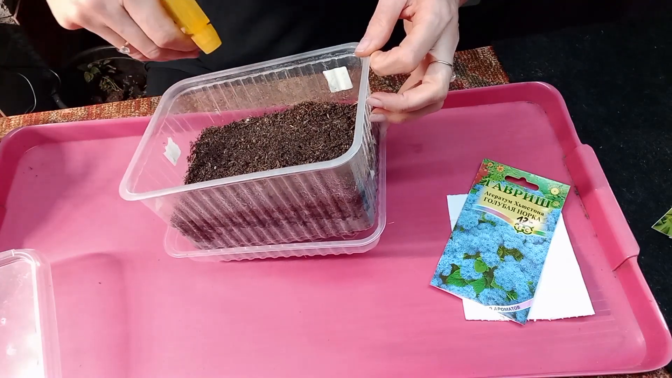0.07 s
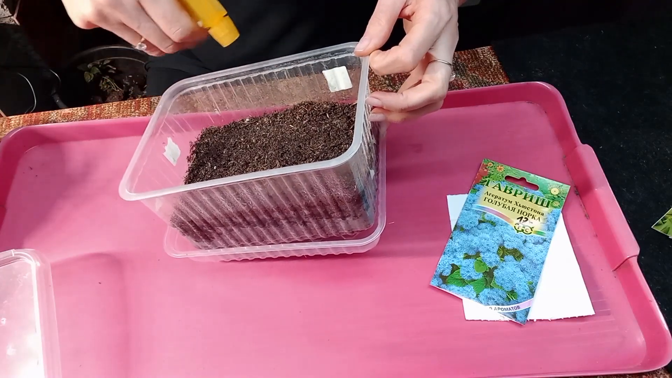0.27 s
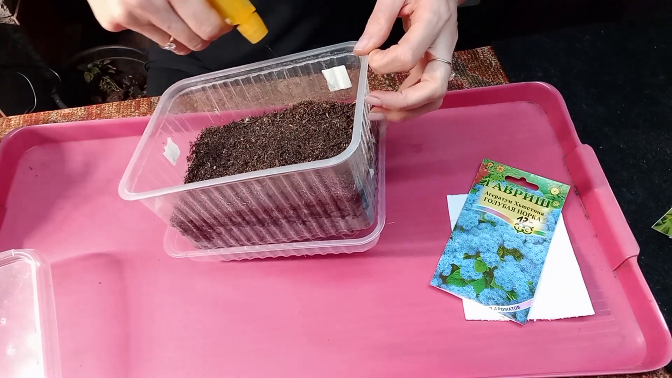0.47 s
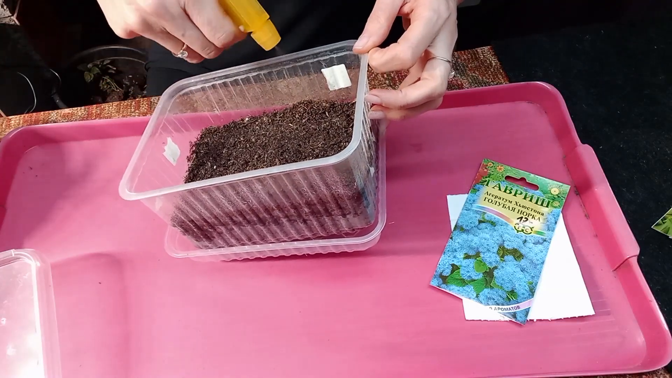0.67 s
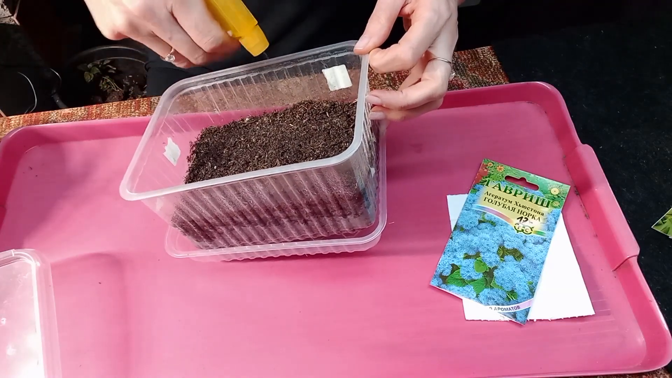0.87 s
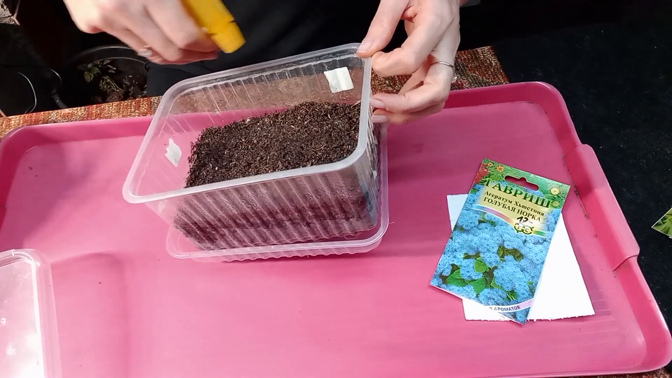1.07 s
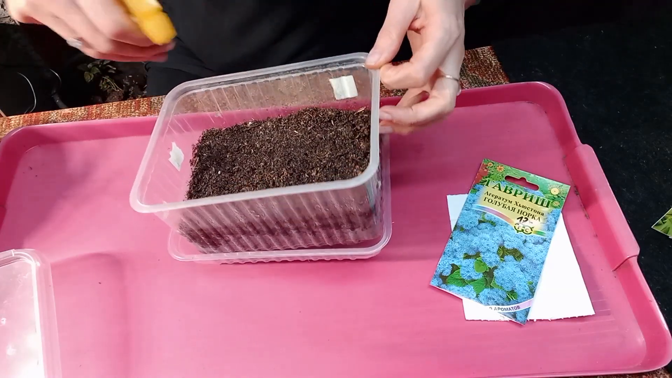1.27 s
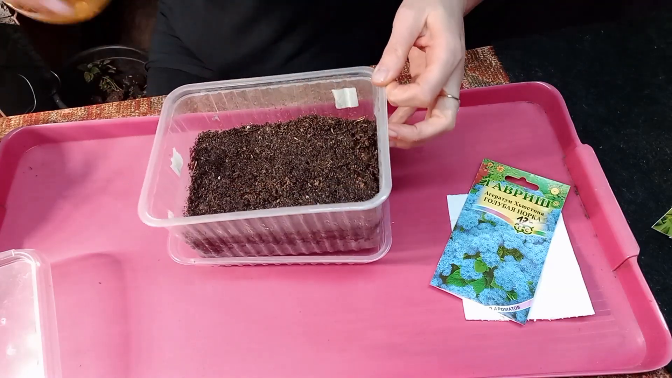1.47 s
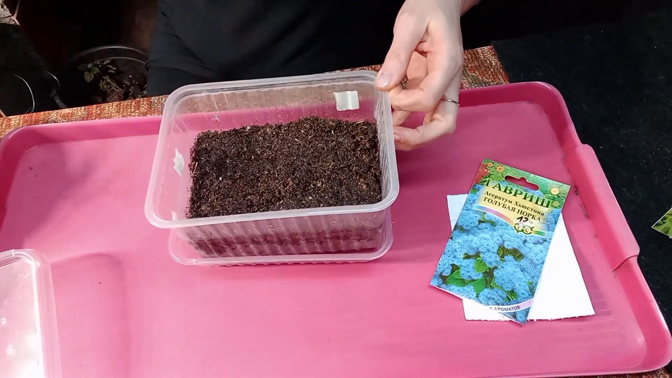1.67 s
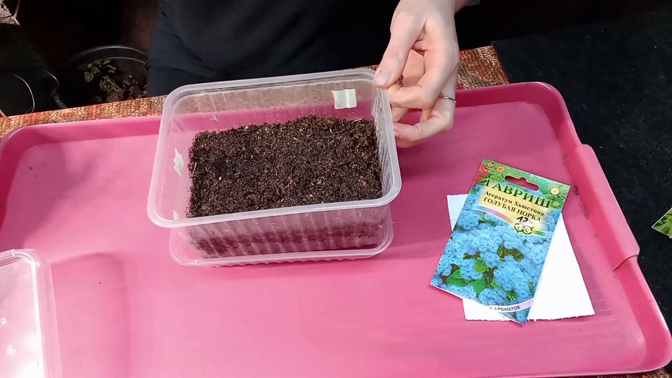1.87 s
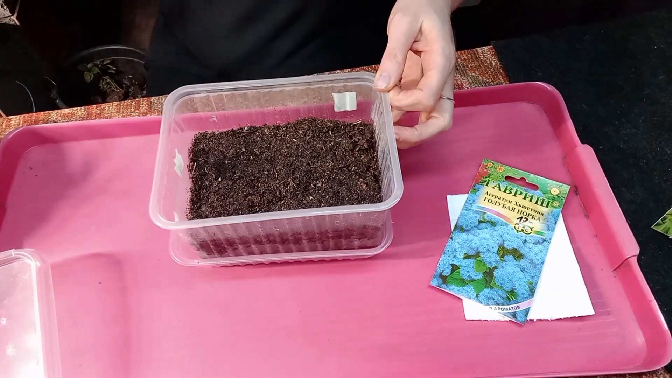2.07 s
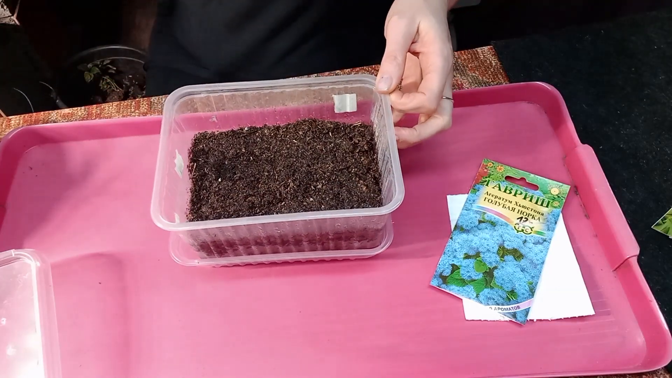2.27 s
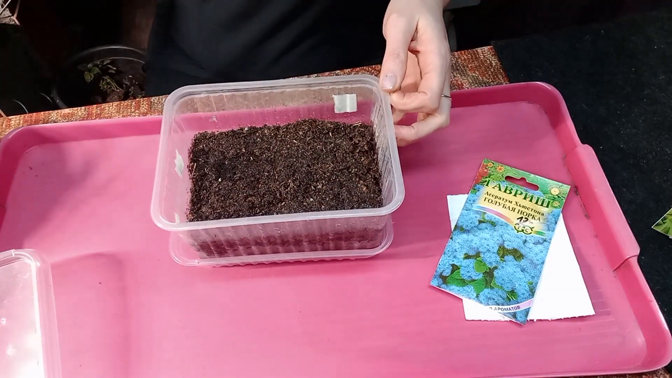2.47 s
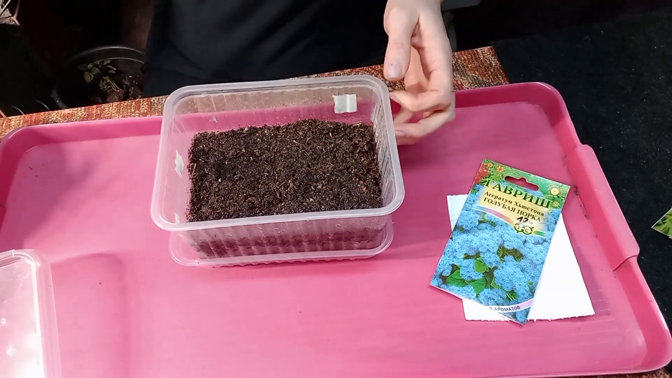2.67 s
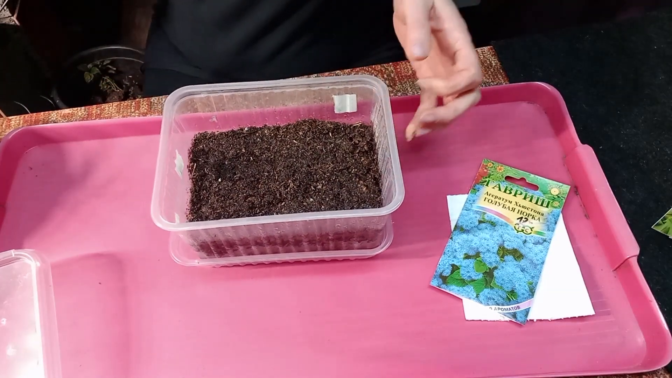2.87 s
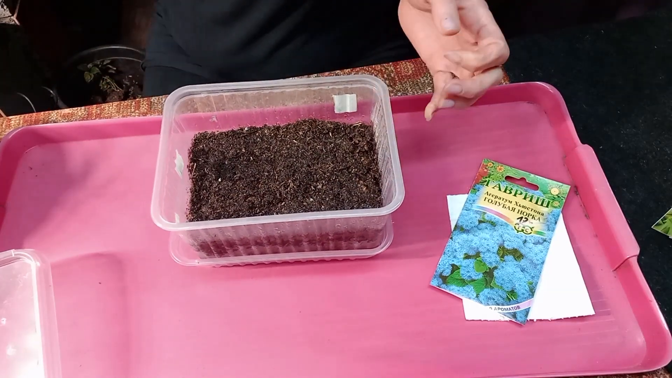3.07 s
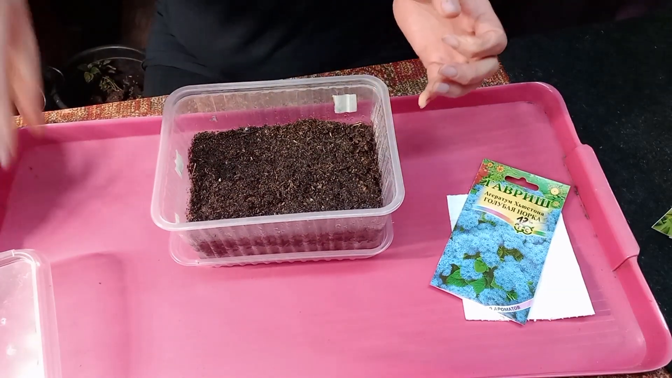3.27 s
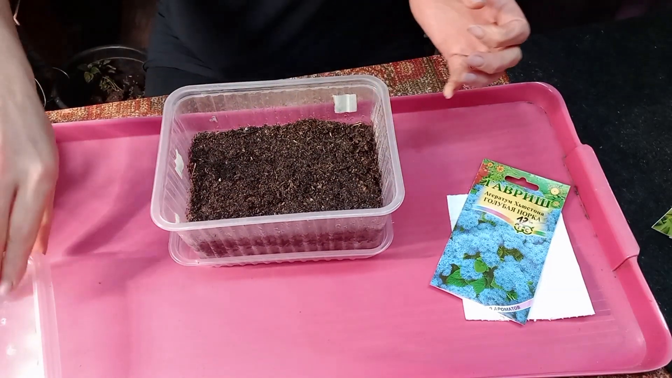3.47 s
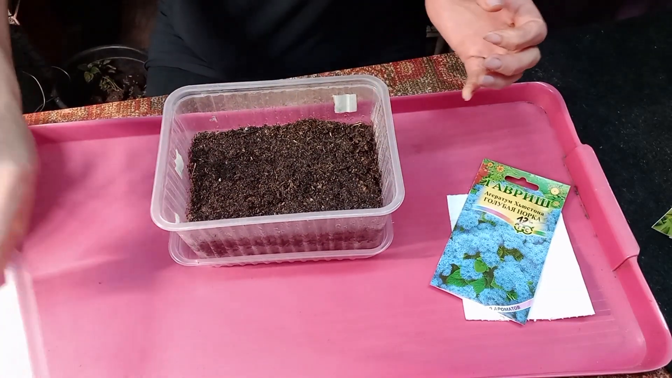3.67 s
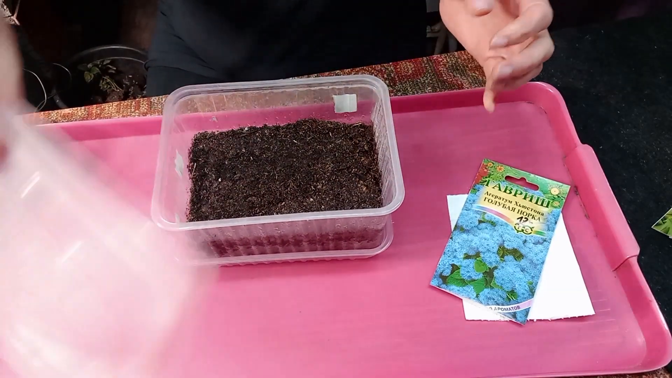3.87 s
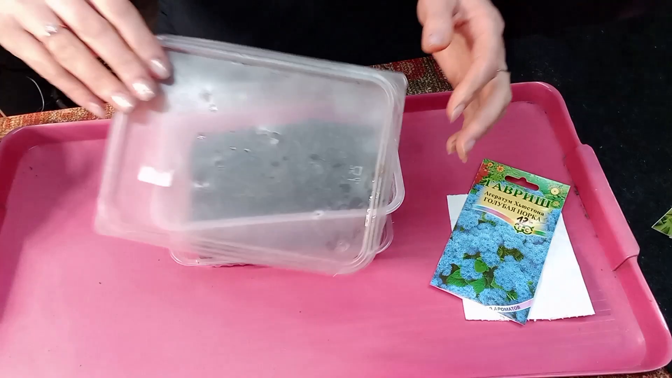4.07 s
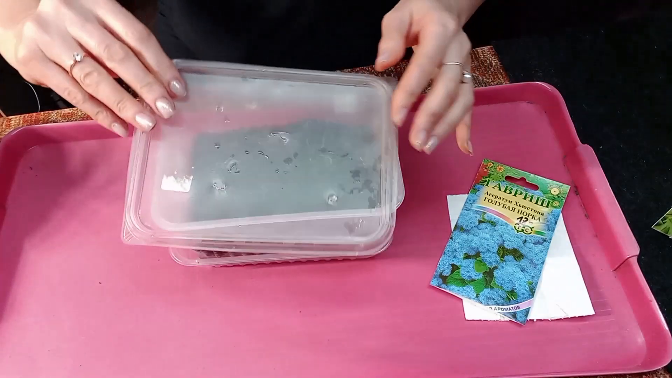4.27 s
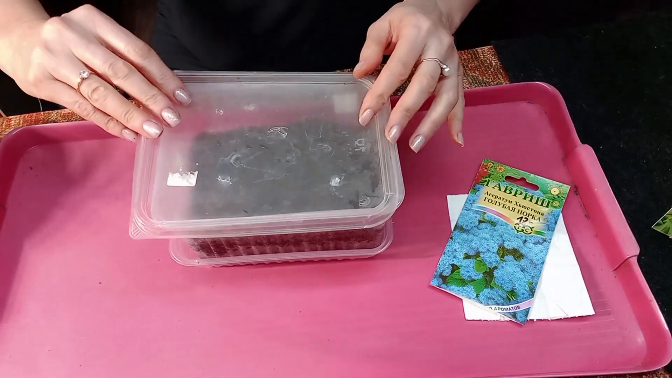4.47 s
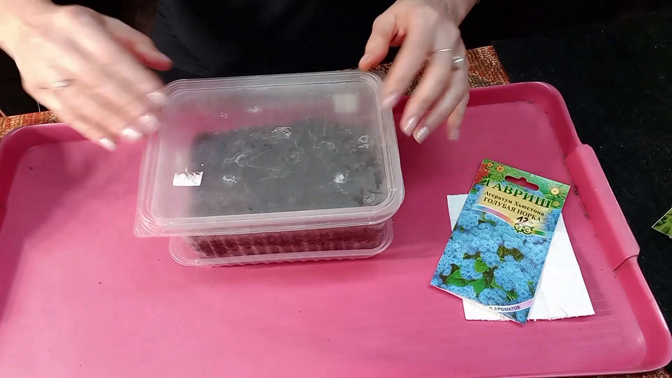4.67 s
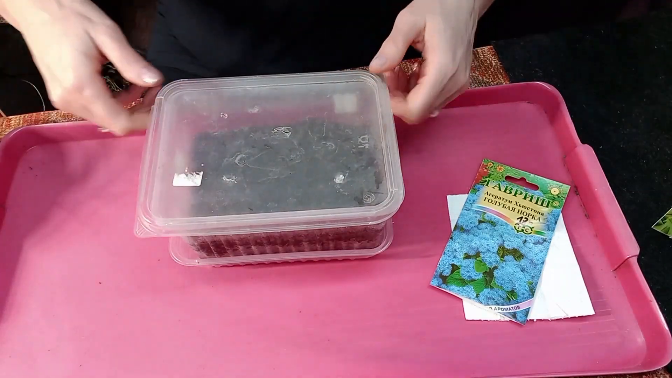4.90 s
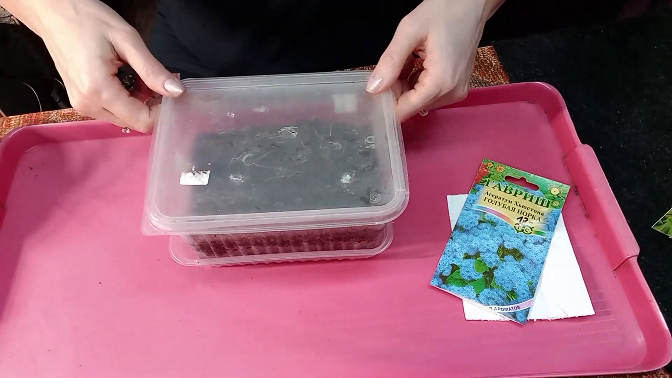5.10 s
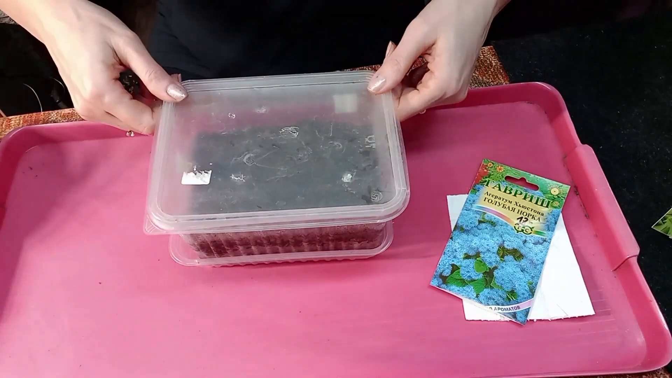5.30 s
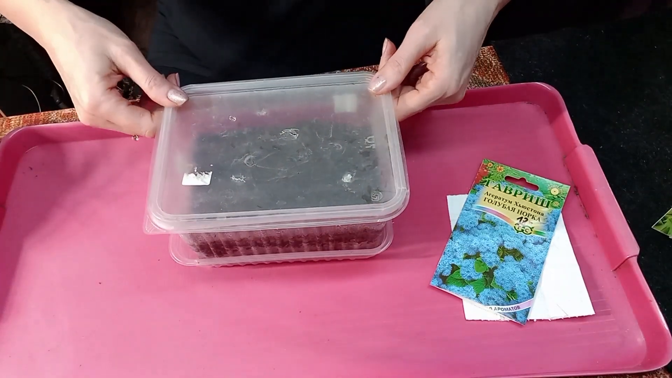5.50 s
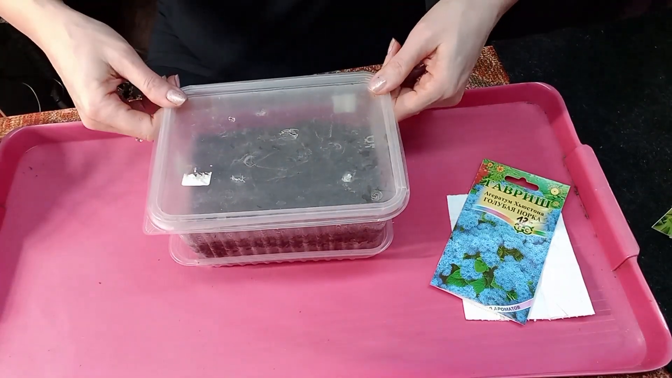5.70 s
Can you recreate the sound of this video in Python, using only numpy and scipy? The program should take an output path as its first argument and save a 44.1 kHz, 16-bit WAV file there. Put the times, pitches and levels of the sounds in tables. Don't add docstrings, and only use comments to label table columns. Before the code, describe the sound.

Recorded very close in a small quiet room with faint steady hiss and a short dull tail. From 0 to 0.5 s a trigger sprayer makes strong airy squirts, with thin whistling edges, sharp lever and valve ticks and hollow bottle bumps. Weaker puffs and dribbles follow, then around 0.92-1.03 s a rapid sputter with bright clicks, fading to drips by 1.2 s. At 1.4-1.5 s the thin plastic tub clacks down, with hands rubbing softly until about 2 s. A tiny glassy ring at 2.17 s is cut off by a soft low thump at 2.3 s. Near quiet lasts until 3.4 s, when plastic scrapes and a loud sharp pop sounds at 3.6 s. The lid touches down with dull knocks around 3.95 s, rattles, rasps and crackles until 4.45 s, is handled lightly from 4.8 s, snaps firmly at 5.16 s, and ends with small rubs and a soft knock at 5.63 s.

```python
import sys
import numpy as np
from scipy import signal
from scipy.fft import rfft, irfft
from scipy.io import wavfile
from scipy.ndimage import uniform_filter1d

SR = 44100
rng = np.random.default_rng(int(sys.argv[2]) if len(sys.argv) > 2 else 0)


def magnitude_from_level(level_db):
    exponent = np.asarray(level_db, float) / 20
    return 10 ** exponent


def generate_wav(sig):
    pcm = np.round(np.clip(np.atleast_2d(sig).T, -1, 1) * 32767).astype(np.int16)
    wavfile.write(sys.argv[1], SR, pcm)


N = 253134
T = np.arange(N) / SR

# (start [s], rise [s], fall [s], jet level [dB])
SQUEEZES = [(0, 0.00058, .013, -28.5), (.006, .017, .045, -26), (0.205, .054, 0.033, -24),
            (.448, 0.044, .031, -28.5), (.588, 0.019, .033, -47), (0.726, 0.0025, 0.023, -33.5),
            (.84, .016, 0.056, -54.5), (.924, 0.0018, 0.006, -41), (.934, 0.0054, .012, -35.5),
            (.951, 0.009, 0.013, -28.5), (.969, 0.003, 0.012, -31), (0.985, 0.005, 0.013, -34),
            (0.992, 0.005, .016, -27), (1.002, .014, 0.028, -26)]
# (start [s], fall [s], jet level [dB])
DRIBBLES = [
    (0.074, 0.018, -50.5),
    (.104, 0.058, -59.5),
    (.331, 0.058, -60),
    (.375, 0.023, -62),
    (0.565, 0.022, -57),
    (.683, 0.094, -58),
    (.803, 0.049, -61.5),
    (1.039, 0.02, -52),
    (1.086, 0.13, -61),
]
# (frequency [Hz], density [dB per Hz])
JET_SPECTRUM = [(180, -37), (300, -22.5), (510, -8.5), (1270, -17), (1850, -1), (2540, -9.5), (3370, -3),
                (6210, -4.5), (9870, -1), (11100, -6), (15700, -4.5)]
# (frequency [Hz], width [Hz], level [dB])
NOZZLE_RESONANCES = [(1710, 140, -2.5), (3810, 420, -2.5), (5100, 2400, -3), (8800, 3200, -3),
                     (10600, 700, -28)]
# (start [s], length
# [s], from [Hz], to [Hz], level [dB])
WHISTLES = [(.005, .05, 9000, 8500, -38), (.022, .014, 5100, 4900, -36), (.04, .022, 2100, 1900, -42),
            (.212, .075, 1750, 1800, -46), (.238, .042, 4150, 3150, -34.5), (.236, .03, 9900, 10300, -36),
            (.24, .035, 8800, 8600, -38), (.238, .03, 5900, 5500, -39), (.212, .03, 6700, 6900, -43),
            (.34, .008, 5900, 5300, -42), (.339, .022, 9600, 9600, -58), (.468, .03, 8700, 8600, -40),
            (.48, .035, 1850, 1750, -47), (.48, .025, 5300, 5000, -43), (.998, .025, 4900, 4700, -36),
            (.998, .035, 9000, 8500, -37), (1.093, .028, 4800, 4800, -56), (1.945, .022, 8300, 8200, -65)]
# (time [s], peak [dB])
LEVER_STOPS = [
    (.123, -26),
    (0.3771, -26),
    (0.8614, -26.5),
]
# (time [s], peak [dB], pitch [Hz])
VALVE_TICKS = [(.0014, -13.5, 8800), (0.077, -30.5, 9900), (.0864, -37, 10900), (.106, -32, 5770),
               (.146, -34.5, 6160), (0.2003, -27, 7600), (0.3304, -30, 9600), (0.3395, -26, 6500),
               (0.446, -28.5, 7910), (.4518, -29, 9200), (0.5681, -29, 9100), (.599, -28.5, 2840),
               (0.616, -28, 6800), (0.6214, -23.5, 4430), (.6863, -36.5, 5430), (.6997, -33, 4570),
               (.7267, -26, 3530), (0.809, -39, 6760), (.9255, -26, 10500), (.94, -35, 8290),
               (.984, -15, 8600), (0.9966, -11, 8600), (1.049, -36.5, 7690), (1.0932, -33.5, 4350),
               (1.1236, -38, 4230)]
# (time [s], peak [dB], pitch [Hz], T60 [s])
BOTTLE_BUMPS = [(0.07, -40.5, 463, 0.062), (0.099, -48.5, 815, 0.22), (0.132, -37, 754, 0.017),
                (0.192, -48.5, 500, 0.22), (0.287, -50.5, 553, 0.018), (0.325, -40.5, 780, 0.039),
                (0.352, -46.5, 826, 0.058), (0.376, -45.5, 925, 0.12), (0.386, -47, 720, 0.032),
                (0.44, -42.5, 740, 0.25), (0.561, -41, 887, 0.033), (0.585, -45.5, 870, 0.035),
                (0.6, -38, 600, 0.06), (0.68, -45.5, 694, 0.13), (0.699, -46.5, 846, 0.21),
                (0.727, -37, 600, 0.09), (0.8, -41.5, 814, 0.043), (0.826, -48, 800, 0.1),
                (0.855, -39, 780, 0.077), (0.874, -39.5, 1140, 0.034), (0.914, -44.5, 1020, 0.18),
                (1.067, -47.5, 500, 0.23), (1.124, -41.5, 860, 0.024)]
# (loudest at [s], swell [s], fade [s], hiss [dB], hollow share [dB])
SLIDES = [(1.25, 0.15, 0.58, -59.5, -8.5), (1.47, 0.091, 0.15, -53, 7.5), (1.6, 0.16, .04, -59, -2.5),
          (1.942, 0.26, 0.11, -56, -2), (3.55, 0.075, 0.016, -58, -8), (4.18, .09, .25, -53, -4),
          (4.376, .16, .08, -46.5, 2.5), (4.892, 0.081, 0.07, -48, .4), (4.96, .09, .015, -50, 0),
          (5.058, 0.02, 0.012, -47, 7.5), (5.27, 0.088, .1, -65, 0), (5.344, 0.027, 0.14, -54, -3.5),
          (5.628, 0.088, 0.064, -53, 1.5)]
# (loudest at [s], swell [s], fade [s], hiss [dB], hollow share [dB])
BRUSHES = [(1.84, 0.09, .1, -60, -12), (4.165, .03, .12, -54, -20), (4.31, .06, .06, -50, -12),
           (3.535, .02, .08, -55, -20), (2.549, .02, 0.031, -78.5, 8), (5.639, 0.063, 0.021, -51.5, -10),
           (4.77, 0.024, .08, -64, -15), (2.3, 0.16, 0.025, -68, -9), (2.432, 0.9, 0.22, -72, 3),
           (3.391, 0.013, .08, -56.5, 0), (3.435, 0.056, 0.06, -55, -0.5), (3.48, 0.073, 0.018, -50, -14),
           (3.571, .035, 0.0094, -48, -20), (5.124, .008, .024, -48.5, -4), (5.122, .04, .03, -64, 14)]
# (time [s], fade [s], hiss [dB], hollow [dB], rumble [dB])
SHUDDERS = [
    (2.171, 0.096, -77, -59, -62),
    (2.329, 0.12, -76, -56.5, -55),
    (3.51, 0.019, -61, -56, -58),
    (3.53, 0.14, -62, -55, -60),
    (3.621, 0.051, -41.5, -41, -35.5),
    (3.95, 0.067, -74, -68, -55),
    (4.04, .4, -86, -58, -48),
    (5.18, 0.038, -61, -38, -33.5),
]
# (time [s], peak [dB], loudest ring [Hz], crack [dB])
TRAY_KNOCKS = [
    (1.393, -43, 900, -7.5),
    (1.435, -33.5, 1780, -10),
    (1.451, -34.5, 1710, -3),
    (1.471, -26, 840, -22),
    (1.715, -46, 1480, -14),
    (1.945, -40.5, 3280, -5),
    (2.315, -40.5, 1290, -32),
]
# (time [s], peak [dB], loudest ring [Hz], crack [dB])
LID_KNOCKS = [(3.373, -46.5, 1040, -16), (3.434, -38, 860, -5), (3.498, -24, 1120, -3),
              (3.937, -33.5, 1060, -3.5), (4.014, -31.5, 910, -15), (4.036, -28, 550, -21),
              (4.158, -44, 2100, -14), (4.184, -37.5, 2080, -9), (4.226, -39, 2000, 0),
              (4.249, -29.5, 520, -5), (4.276, -32.5, 517, -21), (4.311, -45, 845, -3),
              (4.351, -22.5, 794, -45), (4.366, -28, 780, -22), (4.381, -27, 760, -30),
              (4.876, -41, 800, -10.5), (4.894, -31, 540, -32), (4.938, -42, 1760, -3.5),
              (4.96, -36, 470, -37), (5.053, -41, 512, 2.5), (5.118, -40, 830, 12), (5.314, -53, 1960, 4),
              (5.346, -37.5, 545, -0.5), (5.628, -36.5, 766, -37)]
# (time [s], peak [dB], loudest ring [Hz], crack [dB])
RIM_SNAPS = [
    (3.601, -19, 1220, -16),
    (3.604, -14, 1220, -3),
    (3.612, -19.5, 831, -13),
    (5.153, -31, 560, -24),
    (5.157, -16.5, 2050, -27),
    (5.161, -14, 541, -12.5),
    (5.175, -30, 500, -22),
]
# (time [s], peak [dB])
RIM_CLICKS = [
    (5.1185, -24),
    (5.1625, -26.5),
]
# (frequency [Hz], density [dB per Hz])
PLASTIC_SPECTRUM = [(150, -23), (400, -7), (1000, -5), (1550, -8), (2500, -5), (5000, -7.5), (9000, -13.5),
                    (16000, -29.5)]
# (frequency [Hz], width [Hz], level [dB])
TRAY_MODES = [(300, 90, 9), (540, 110, 8), (795, 230, 10.5), (1220, 64, 0.5), (2050, 810, 3.5),
              (2430, 490, 5), (3100, 160, 2.5), (3950, 1000, 5)]
# (time [s], peak [dB])
TABLE_THUDS = [(1.471, -69), (2.315, -47), (3.373, -53.5), (3.499, -54), (3.603, -43), (3.936, -36.5),
               (4.013, -34.5), (4.16, -58), (4.278, -43.5), (4.38, -34), (4.937, -40.5), (5.158, -46),
               (5.161, -30), (5.175, -43), (5.627, -53)]
# (frequency [Hz], level [dB], T60 [s])
TABLE_MODES = [(110, 3, 0.078), (140, 3.5, 0.13), (184, -3, 0.16), (272, -1, 0.11)]
# (time [s], level [dB], frequency [Hz], T60 [s])
LANDING = [
    (2.32, -41, 101, 0.22),
    (2.315, -52, 390, .06),
    (2.325, -51, 210, .12),
    (2.372, -53, 275, 0.09),
    (2.407, -50, 110, 0.097),
]
# (loudest at [s], swell [s], fade [s], level [dB], pitch [Hz])
RASPS = [(2.44, 0.015, 0.02, -65.5, 1800), (3.385, .012, 0.079, -58.5, 1150), (3.43, 0.03, 0.07, -55, 1250),
         (3.551, 0.098, 0.017, -64, 3100), (4.25, .12, 0.12, -55.5, 2280),
         (4.385, 0.058, 0.06, -50.5, 2270), (4.472, 0.038, .03, -58, 550), (3.1, .06, .05, -79, 1330),
         (4.25, .12, .1, -60, 12000), (4.38, .08, .03, -56, 11500), (4.9, .05, .1, -62, 12000),
         (5.165, .006, .03, -46, 12500), (5.63, .06, .03, -61, 12500)]
# (start [s], length [s], from [Hz], to [Hz], level [dB])
SCRAPES = [(1.75, .07, 3100, 3300, -69), (1.78, .1, 5600, 5400, -68), (1.79, .09, 10000, 9300, -68),
           (2.17, .07, 800, 740, -68), (2.18, .04, 420, 450, -68), (2.49, .06, 900, 780, -74),
           (3.408, .045, 950, 850, -56), (3.52, .05, 2700, 3050, -54), (3.55, .027, 7300, 7700, -53),
           (3.556, .022, 9400, 9500, -46), (4.055, .03, 420, 380, -53), (4.085, .05, 850, 700, -57),
           (4.125, .055, 420, 380, -53), (4.225, .035, 520, 540, -45), (4.31, .045, 6400, 6100, -58),
           (4.33, .025, 800, 760, -48), (4.385, .037, 780, 740, -46), (4.378, .025, 2500, 2200, -50),
           (4.8, .03, 900, 800, -64), (4.835, .055, 750, 800, -60), (4.91, .025, 5000, 5600, -57),
           (5.095, .04, 560, 580, -55)]
# (time [s], peak [dB], pitch [Hz], T60 [s])
CRACKLES = [(.116, -42, 5900, .012), (.7, -44, 9200, .008), (.712, -46, 8500, .008), (.82, -46, 6800, .01),
            (.889, -44, 9000, .008), (.624, -37, 690, .05), (.689, -44, 580, .03), (.74, -34, 1450, .02),
            (.742, -38, 620, .03), (.836, -42, 1100, .03), (.877, -38, 1370, .04),
            (1.3945, -38, 4300, .008), (1.419, -48, 2500, .008), (1.444, -38, 1800, .012),
            (1.457, -35, 2400, .012), (1.458, -41, 9000, .01), (1.4715, -33, 4700, .006),
            (1.534, -46, 900, .04), (1.602, -52, 3500, .01), (1.605, -52, 10000, .008),
            (1.67, -56, 4500, .006), (1.678, -52, 3200, .008), (1.855, -44, 5200, .008),
            (1.891, -52, 800, .03), (1.926, -48, 8000, .008), (2.378, -60, 1450, .03),
            (2.41, -60, 1400, .03), (2.436, -58, 1450, .03), (3.391, -52, 7000, .02),
            (3.46, -49, 1300, .02), (4.087, -46, 900, .03), (4.196, -44, 2100, .015),
            (4.215, -46, 5000, .01), (4.238, -43, 2200, .015), (4.254, -38, 3000, .012),
            (4.304, -45, 2100, .02), (4.313, -45, 4000, .014), (4.341, -42, 2000, .015),
            (4.16, -46, 2300, .02), (4.365, -40, 1700, .015), (4.29, -47, 3200, .01),
            (4.455, -47, 490, .04), (4.895, -42, 4300, .01), (4.94, -44, 2800, .01),
            (5.055, -40, 4300, .008), (5.119, -32, 4600, .007), (5.163, -19, 550, .09),
            (3.606, -22, 3500, .015), (5.331, -56, 1900, .02)]
# (frequency [Hz], level [dB], T60 [s])
GLASS_MODES = [(590, -62, 0.2), (1400, -67, 0.96), (1575, -59.5, 0.72), (2770, -74.5, 0.74),
               (7320, -43, 0.072), (8500, -43, 0.057), (10400, -61, 0.079)]
# (frequency [Hz], density [dB per Hz])
MIC_HISS_SPECTRUM = [(15, -47), (25, -20), (91, -4.5), (324, -8), (370, -15.5), (460, -11.5), (2580, -20.5),
                     (2800, -18), (6630, -10), (15700, -15)]


def unit(x):
    return x / np.sqrt(np.mean(x ** 2))


def band(x, lo_hz, hi_hz):
    sos = signal.butter(2, [lo_hz, min(hi_hz, SR / 2.2)], "band", fs=SR, output="sos")
    return signal.sosfilt(sos, x)


def colour(x, points, peaks=()):
    hz = np.maximum(np.arange(1025) * SR / 2048, 1)
    db = np.interp(np.log(hz), np.log([p[0] for p in points]), [p[1] for p in points])
    db = db + sum(gain / (1 + (2 * (hz - centre) / width) ** 2) for centre, width, gain in peaks)
    cepstrum = irfft(np.log(magnitude_from_level(db)))
    cepstrum[1:1024] *= 2
    cepstrum[1025:] = 0
    impulse = irfft(np.exp(rfft(cepstrum)))
    return unit(signal.fftconvolve(x, impulse)[:len(x)])


def flutter(rate_hz, depth_db):
    hold = int(SR / rate_hz)
    levels = np.repeat(rng.standard_normal(N // hold + 1), hold)[:N]
    return unit(magnitude_from_level(depth_db * uniform_filter1d(levels, hold // 2 + 1)))


def grit(rate_hz, spread_db):
    clicks = (rng.random(N) < rate_hz / SR) * rng.standard_normal(N)
    return unit(clicks * magnitude_from_level(spread_db * rng.exponential(size=N)))


def decay(t60, size):
    return np.exp(-np.log(1000) * T[:size] / t60)


def ring(hz, t60, size=9000):
    return np.sin(2 * np.pi * hz * T[:size]) * decay(t60, size)


def burst(lo_hz, hi_hz, t60, size=9000):
    x = band(rng.standard_normal(size) * decay(t60, size), lo_hz, hi_hz)
    return x / np.abs(x).max()


def swell(s, rise, fall):
    return magnitude_from_level(20 * np.minimum((T - s) / rise, (s - T) / fall))


def add(out, s, x):
    i = int(s * SR)
    out[i:i + len(x)] += x[:N - i]


def glide(rows, share, wider_hz=0, grain_db=0):
    out = np.zeros(N)
    for s, length, from_hz, to_hz, db in rows:
        part = np.linspace(0, 1, int(length * SR))
        real, imaginary, loudness = rng.standard_normal((3, 6000))
        grains = (real + 1j * imaginary) * magnitude_from_level(grain_db * np.repeat(loudness, 90)[:6000])
        lowpass = signal.butter(2, (share * from_hz + wider_hz) / 2, fs=SR)
        slow = signal.lfilter(*lowpass, grains)[1000:1000 + len(part)]
        phase = 2 * np.pi * np.cumsum(from_hz + (to_hz - from_hz) * part) / SR
        note = unit((slow * np.exp(1j * phase)).real)
        add(out, s, magnitude_from_level(db) * note * np.sin(np.pi * part) ** .8)
    return out


def spray():
    dribble_rise_s = 0.0059
    dull_knee_db, dull_slope = -47, 0.76
    jet_flow, dull_flow = np.zeros((2, N))
    for s, rise, fall, db in SQUEEZES + [(s, dribble_rise_s, fall, db) for s, fall, db in DRIBBLES]:
        dull_db = min(dull_slope * (dull_knee_db - db), 1.5)
        stroke = np.interp(T, [s, s + rise, s + rise + fall], [0, 1, 2])
        pressure = np.maximum(np.sin(np.pi / 2 * stroke), 0) ** 1.28
        jet_flow += pressure * magnitude_from_level(db)
        dull_flow += pressure * magnitude_from_level(db + dull_db)
    tearing = rng.standard_normal(N) * flutter(400, 1.7) + .2 * grit(3000, 1.2)
    jet = colour(tearing, JET_SPECTRUM) * flutter(120, 0.4)
    for hz, width, db in NOZZLE_RESONANCES:
        resonance = unit(band(tearing, hz - width / 4, hz + width / 4))
        jet = jet + magnitude_from_level(db - 20.5) * resonance * flutter(69.5, 5.6)
    top = band(jet, 10500, 15000)
    jet = jet - top * np.clip(1 - jet_flow / magnitude_from_level(-32), 0, .6)
    spits = unit(band(grit(600, 1.2), 1500, 10000))
    dull = unit(band(tearing[::-1], 1090, 2960)) * flutter(150, 0.65)
    blast_rumble = unit(band(rng.standard_normal(N), 92, 480))
    out = jet_flow * (jet + magnitude_from_level(-36.0) * blast_rumble)
    out = out + magnitude_from_level(-4) * np.minimum(jet_flow, magnitude_from_level(-49)) * spits
    return out + magnitude_from_level(-2.5) * dull_flow * dull


def whistles():
    return glide(WHISTLES, .05)


def trigger():
    stop_hz, rebound_hz, rebound_s, rebound_db = 3370, 4640, .0087, -1.2
    out = np.zeros(N)
    lever = []
    for s, db in LEVER_STOPS:
        lever += [(s, db, stop_hz), (s + rebound_s, db + rebound_db, rebound_hz)]
    for s, db, hz in lever + VALVE_TICKS:
        tick = burst(hz / 1.24, hz * 1.156, 0.012)
        tick = tick + magnitude_from_level(-11) * burst(8700, 19000, 0.0066) + magnitude_from_level(-6.5) * burst(3000, 11000, 0.0083)
        add(out, s + 0.001, magnitude_from_level(db - 6.0) * tick)
    return out


def bottle():
    glug_db, glug_t60_s, glug_sag_per_s = -6.5, 0.035, 18
    out = np.zeros(N)
    t = T[:2000]
    for s, db, hz, t60 in BOTTLE_BUMPS:
        bump = burst(hz / 1.174, hz * 1.19, t60) + magnitude_from_level(2) * burst(470, 1200, t60)
        add(out, s, magnitude_from_level(db - 3.0) * bump)
        glug = np.sin(2 * np.pi * 1.2 * hz * t * (1 - glug_sag_per_s * t / 2)) * decay(glug_t60_s, 2000)
        add(out, s + 0.00196, magnitude_from_level(db + glug_db) * glug)
    return out


def strokes(rows):
    rumble_share_db = -16
    gains = np.zeros((3, N))
    for s, rise, fall, db, share in rows:
        levels = np.array([[db], [db + share], [db + share + rumble_share_db]])
        gains += swell(s, rise, fall) * magnitude_from_level(levels)
    return gains


def rubbing():
    slide_hz, brush_hz, shudder_rise_s = 4620, 7060, 0.0047
    slips = rng.standard_normal(N) * flutter(120, 2.7) + 0.064 * grit(820, 0.92)
    slide, brush = strokes(SLIDES), strokes(BRUSHES)
    for s, fall, *db in SHUDDERS:
        slide = slide + swell(s, shudder_rise_s, fall) * magnitude_from_level(np.array(db)[:, None])
    gain = slide + brush
    centre = np.log(slide_hz) + np.log(brush_hz / slide_hz) * brush[0] / gain[0]
    hiss = .5 * colour(slips, [(800, -32.0), (2000, 1.5), (9000, 8), (11500, -7.5), (16000, -1.5)])
    for hz in (2500, 3700, 5500, 8000, 10000):
        patch = unit(band(slips, hz / 1.4, hz * 1.2)) * flutter(50, 2.5)
        hiss = hiss + patch * np.exp(-((centre - np.log(hz)) / 0.53) ** 2)
    body = colour(rng.standard_normal(N), [(200, -25.5), (400, 1), (900, -1), (1600, -1.5), (2500, -19)],
                  [(530, 64, 6.0), (826, 105, 4.9)])
    body = body * flutter(90, 2.5)
    rumble = unit(band(rng.standard_normal(N), 70, 280)) * flutter(25, 0.86)
    return magnitude_from_level(-7.0) * gain[0] * hiss + magnitude_from_level(-6.5) * gain[1] * body + magnitude_from_level(-5.5) * gain[2] * rumble


def plastic_knocks():
    out = np.zeros(N)
    blows = []
    for rows, t60 in ((TRAY_KNOCKS, 0.06), (LID_KNOCKS, 0.055), (RIM_SNAPS, 0.072)):
        blows += [(*row, t60) for row in rows]
    for s, db, own_hz, crack_db, t60 in blows:
        chance = rng.standard_normal(len(TRAY_MODES))
        spot = [(hz, width, gain + 0.78 * a) for (hz, width, gain), a in zip(TRAY_MODES, chance)]
        shake = burst(134, 1350, t60) + magnitude_from_level(0.59 * crack_db + 21.5) * burst(870, 18000, 0.56 * t60)
        plate = colour(shake, PLASTIC_SPECTRUM, spot)
        own_ring = ring(own_hz, 0.79 * t60 * min(650 / own_hz, 1))
        panel = signal.fftconvolve(own_ring, burst(137, 5900, 0.031, size=1500))[:len(plate)]
        plate = plate / np.abs(plate).max() + 0.56 * panel / np.abs(panel).max()
        crack = burst(2200, 9800, 0.25 * t60)
        crack = crack + magnitude_from_level(0.51 * crack_db - 6.5) * burst(8300, 19000, 0.071 * t60)
        add(out, s + 0.00118, magnitude_from_level(db - 5.0) * plate + magnitude_from_level(db + crack_db + 0.5) * crack)
    for s, db in RIM_CLICKS:
        add(out, s, magnitude_from_level(db) * burst(6000, 22000, .008))
    return out


def table():
    out = np.zeros(N)
    for s, db in TABLE_THUDS:
        modes = sum(magnitude_from_level(gain) * ring(hz, t60) for hz, gain, t60 in TABLE_MODES)
        thud = signal.fftconvolve(modes, burst(53, 620, 0.048, size=3000))
        add(out, s + 0.00533, magnitude_from_level(db - 6.5) * thud / np.abs(thud).max())
    for s, db, hz, t60 in LANDING:
        soft_front = np.minimum(T[:9000] / 0.016, 1)
        add(out, s, magnitude_from_level(db) * ring(hz, t60) * soft_front)
    return out


def rasp():
    slips = (grit(700, 2) + .4 * rng.standard_normal(N)) * flutter(60, 2.5)
    out = np.zeros(N)
    for s, rise, fall, db, hz in RASPS:
        out += magnitude_from_level(db) * swell(s, rise, fall) * unit(band(slips, hz / 1.39, hz * 1.22))
    return out


def scrapes():
    return glide(SCRAPES, .16, wider_hz=260, grain_db=3.5)


def crackle():
    out = np.zeros(N)
    for s, db, hz, t60 in CRACKLES:
        puff = burst(hz / 1.5, hz * 1.6, .8 * t60, size=3000)
        add(out, s, magnitude_from_level(db - 5.0) * (ring(hz, t60, size=3000) + magnitude_from_level(-1.5) * puff))
    return out


def chink():
    touched_s, damped_s = 2.168, 2.31
    out = np.zeros(N)
    modes = sum(magnitude_from_level(db) * ring(hz, t60) for hz, db, t60 in GLASS_MODES) * np.minimum(T[:9000] / 0.023, 1)
    add(out, touched_s, modes + magnitude_from_level(-43) * burst(4700, 11400, 0.066))
    return out * flutter(38.6, 0.78) * np.clip((damped_s - T) / 0.0057 + 1, 0, 1)


def small_room(near):
    tail = burst(170, 6100, 0.096)
    tail = tail / np.sqrt(np.sum(tail ** 2))
    return signal.fftconvolve(near, np.r_[np.zeros(180), tail])[:N]


def microphone_hiss():
    return magnitude_from_level(-68.5) * colour(rng.standard_normal(N), MIC_HISS_SPECTRUM)


def channel_difference(near, room):
    side = magnitude_from_level(-82) * colour(rng.standard_normal(N), [(30, -14), (400, -0.5), (900, -12.5), (3000, -12.5),
                                                      (7000, -1.0), (16000, -1.0)])
    side = side + magnitude_from_level(-36) * np.roll(band(room, 280, 600), 60)
    side = side + magnitude_from_level(-46.5) * np.roll(band(room, 900, 5000), 40)
    return side + magnitude_from_level(-39) * np.roll(band(near, 3500, 15000), 3)


def scene():
    near = spray() + whistles() + trigger() + bottle()
    near = near + rubbing() + plastic_knocks() + table()
    near = near + rasp() + scrapes() + crackle() + chink()
    room = small_room(near)
    mid = near + magnitude_from_level(-15) * room + microphone_hiss()
    side = channel_difference(near, room)
    return np.array([mid + side, mid - side])


def low_pass(x):
    return signal.sosfilt(signal.butter(12, 16550, fs=SR, output="sos"), x)


def record(dry):
    dry = signal.sosfilt(signal.butter(3, 50, "high", fs=SR, output="sos"), dry)
    dry = signal.sosfilt(signal.cheby2(12, 28, 15950, fs=SR, output="sos"), dry)
    return low_pass(dry)


dry = scene()
out = record(dry)
generate_wav(out)
```